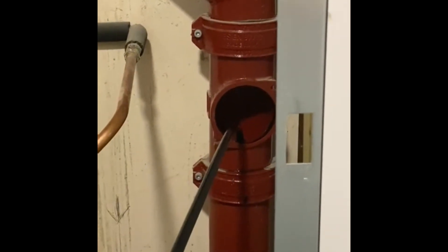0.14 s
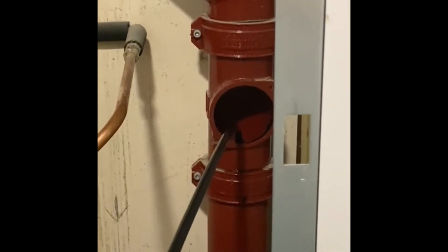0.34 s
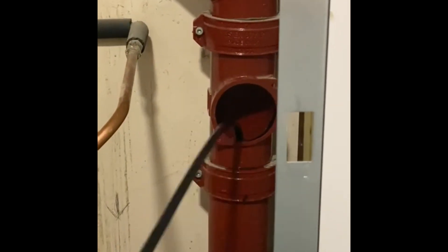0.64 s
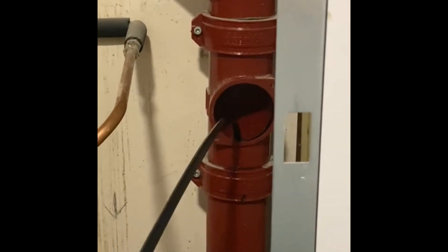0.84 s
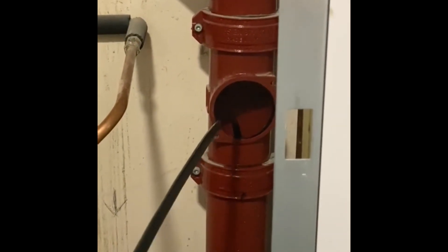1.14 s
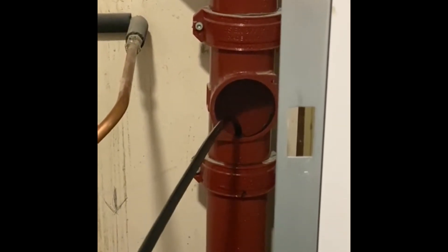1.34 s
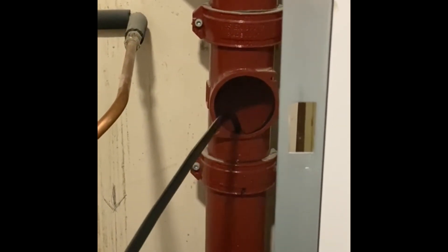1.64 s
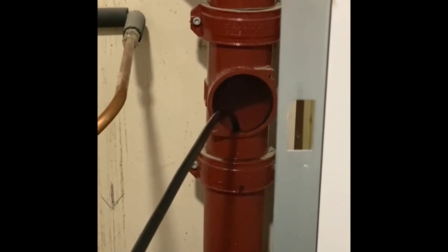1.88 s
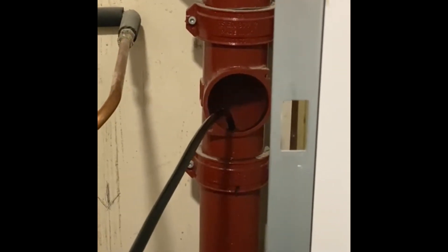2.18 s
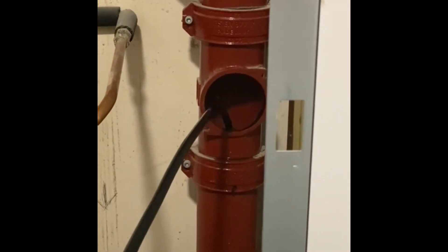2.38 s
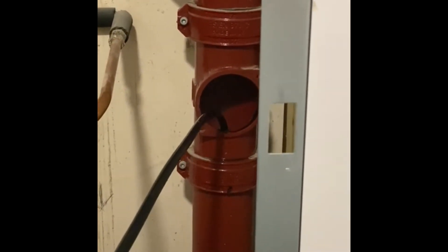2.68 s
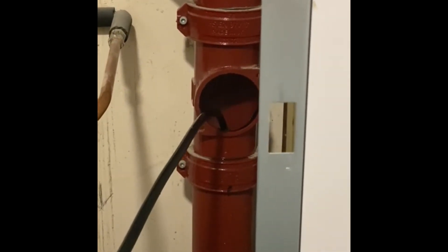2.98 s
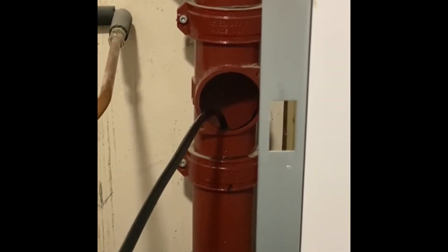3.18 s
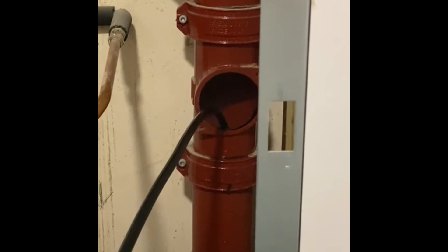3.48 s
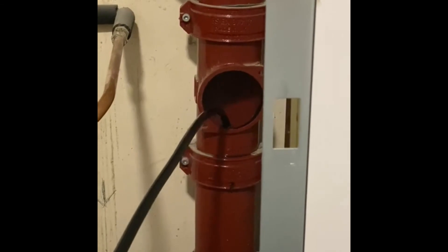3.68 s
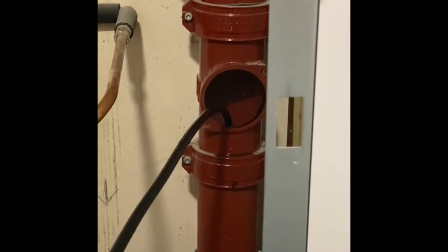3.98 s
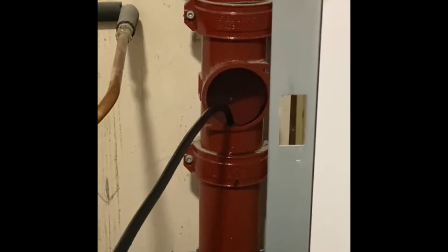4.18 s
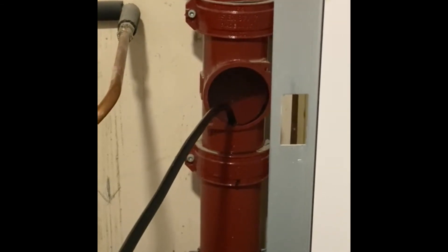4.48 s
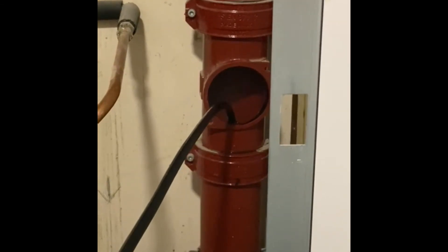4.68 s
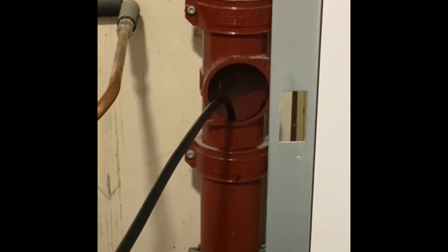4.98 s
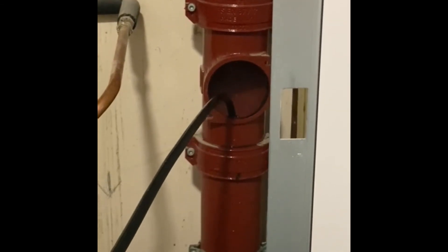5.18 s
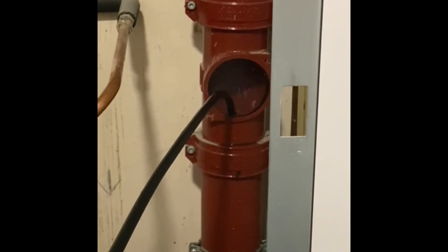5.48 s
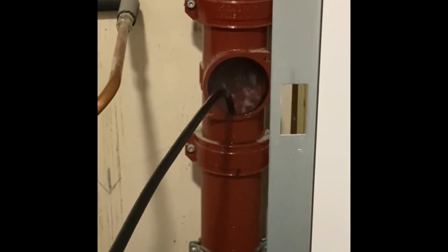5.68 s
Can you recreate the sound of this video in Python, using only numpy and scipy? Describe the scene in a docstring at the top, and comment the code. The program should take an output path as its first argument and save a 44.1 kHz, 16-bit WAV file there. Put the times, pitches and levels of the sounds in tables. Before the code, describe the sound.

For nearly six seconds a drain-cleaning machine runs close by in a small, reflective room. Its motor makes a steady low hum around 49 hertz with a dense buzzing stack of overtones, swaying and throbbing about twice a second, with an airy fan rush. Deep in an iron pipe the turning cable rumbles in dull, uneven thuds and rasps faintly with metallic resonance, the scraping strongest around 2 to 4 seconds. A double knock sounds at 0.3 seconds, and the rumble briefly jumps near 0.45 as the cable binds. Small ticks cluster at 0.9 to 1.1, another faint one at 1.7, then the brightest, loudest clank with quick rebounds at 2.45, ringing briefly. A mild bind thickens the rumble around 3.4. Near 5.7 the cable binds hard, the rumble surging and the motor growling under strain. Bright wide hiss grows slowly overall; the hand-held stereo microphone's drift shifts the hum's colour.

```python
"""An induction motor hums and throbs close by: a drain-cleaning machine at work in a small room.
The load of the cable sways its speed about twice a second; the hum is a stack of shaft orders.
The cable turns in an open iron drain pipe: shaped noise rumbles and scrapes, binding a few times.
Knocks ring as decaying pipe modes with scattered echoes, under a hiss that grows slowly overall.
A hand-held microphone with two ports drifts between two spots in the room's standing waves."""
import sys
import numpy as np
from scipy import signal
from scipy.fft import rfft, irfft, next_fast_len
from scipy.io import wavfile

SR = 44100
rng = np.random.default_rng(int(sys.argv[2]) if len(sys.argv) > 2 else 0)


def generate_wav(sig):
    """Save sig (samples, or channels by samples) to the path in sys.argv[1] as 16-bit PCM at SR."""
    pcm = np.round(np.clip(np.atleast_2d(sig).T, -1, 1) * 32767).astype(np.int16)
    wavfile.write(sys.argv[1], SR, pcm)


N = 257367
TIME = np.arange(N) / SR  # s

# drift of the hand-held microphone: t/s, place [0 = first spot, 1 = second spot]
MIC_PLACE = [(0, 0.28), (.9, 0.014), (1.5, 0.36), (2.5, 0.68), (3.6, 0.88), (4.5, 1.08), (5.84, 0.89)]
# how hard the housing buzzes: t/s, level/dB
MOTOR_EFFORT = [(0, 0), (1.3, 1), (1.6, 1.3), (2.6, 0.75), (3.8, -0.26), (5.84, 0)]
# the cable binds: t/s, half length/s, rise of the rumble/dB, strain on the motor [1 = full]
CABLE_BINDS = [(0.454, 0.061, 4, 0), (3.4, 0.3, 1.5, 0.1), (5.68, 0.16, 4, 1.1)]

SHAFT_HZ = 49.01  # mean turns per second
SWAY_RATE = 2.055  # sways of the speed per second
BEATS_PER_TURN = 4


def gain_of(db):
    """Decibels to amplitude."""
    return 10 ** (np.asarray(db) / 20)


def evened(x):
    """Scales to rms 1."""
    return x / np.sqrt(np.mean(abs(x) ** 2) + 1e-20)


def curve(rows):
    """Joins (s, value) rows by straight lines."""
    return np.interp(TIME, *np.transpose(rows))


def read(points, hz):
    """Reads (Hz, value) rows on a log-frequency axis."""
    f, value = np.transpose(points)
    return np.interp(np.log(hz + 1), np.log(abs(f) + 1), value)


def swell(s, half_s):
    """A smooth rise to 1 and fall around time s."""
    return np.exp(-((TIME - s) / half_s) ** 2)


def wander(rate_hz, size=2048):
    """Slow random motion of rms 1, up to about rate_hz."""
    hz = np.fft.rfftfreq(size, TIME[-1] / size)
    lowpass = np.exp(-.5 * (hz / rate_hz) ** 2)
    slow = irfft(rfft(rng.standard_normal(size)) * lowpass)
    return np.interp(TIME, np.linspace(0, TIME[-1], size), evened(slow))


def add(mix, s, sound):
    """Adds a stereo sound into the mix at time s."""
    part = mix[:, round(s * SR):][:, :sound.shape[1]]
    part += sound[:, :part.shape[1]]


def port_noise(colour_db, size=N, density=1):
    """Noise of spectrum colour_db(Hz), dB per Hz, at the two ports; density under 1 thins it to clicks."""
    # how alike the two ports hear: f/Hz, likeness [0-1]
    likeness = [(200, 1), (300, .94), (480, .73), (900, .55), (1400, .3), (1700, .98), (2100, 1),
                (2500, .9), (3300, 1), (4150, 1), (4600, .86), (6000, .92), (7000, .97), (7600, 1)]
    # by how much the left port leads, up to opposite phase at the top: f/Hz, lead/rad
    port_lead = [(0, 1), (2150, 0), (2500, .6), (3200, .15), (4100, .05), (4400, 1.1), (5000, 2.4),
                 (5400, 1.5), (6000, 1.65), (6500, 1.9), (7050, 2.55), (7700, np.pi)]
    length = next_fast_len(size, True)
    hz = np.fft.rfftfreq(length, 1 / SR)
    kept = rng.random(length) < density
    left, other = rfft(rng.standard_normal((2, length)) * kept)
    apart = hz > likeness[0][0]  # longer waves reach both ports alike
    same = np.where(apart, np.clip(read(likeness, hz), 0, 1), 1)
    right = same * left + np.sqrt(1 - same ** 2) * other
    right = right * np.exp(-1j * apart * read(port_lead, hz))
    spectrum = gain_of(colour_db(hz)) * np.sqrt(SR / 2)
    return irfft(np.array([left, right]) * spectrum)[:, :size]


def hiss(grain_db=.45, swell_db=.3):
    """A smooth, bright noise, very wide at the top where the two sides sound in opposite phase."""
    # spectrum before the level curve: f/Hz, level/dB per Hz
    hiss_colour = [(500, -100), (1400, -89.5), (1900, -86.5), (2400, -85), (3100, -82.5), (3700, -83),
                   (4400, -80.5), (5000, -81.5), (5400, -80), (6000, -80), (6500, -78.5), (7500, -79),
                   (8500, -78.5), (9500, -81), (10400, -77.5), (11200, -79), (11900, -87)]
    # overall rise: t/s, level/dB
    hiss_level = [(0, -6.5), (.55, -3), (1.5, -3.5), (2.2, -2), (3.2, -0.3), (4.5, .5), (5.84, -0.5)]
    level_db = curve(hiss_level) + grain_db * wander(57) + swell_db * wander(8.0)
    return port_noise(lambda hz: read(hiss_colour, hz)) * gain_of(level_db)


def rumble(lumpy_db=1.3, thuds_per_s=11, thud=.6, thud_s=.025, roll=.65):
    """The cable rolls and flops on the wall far down the pipe in dull, uneven thuds, harder where it binds."""
    # cable tumbling deep in the pipe, before binding: f/Hz, level/dB per Hz
    rumble_colour = [(15, -83), (38, -73), (55, -58), (70, -65.5), (120, -62.5), (180, -64), (270, -71),
                     (370, -74), (480, -79.7), (900, -105)]
    bind_db = sum(rise_db * swell(s, half_s) for s, half_s, rise_db, _ in CABLE_BINDS)
    thud_count = np.cumsum(thuds_per_s * np.exp(wander(6) / 2)) / SR
    age = thud_count % 1 / thuds_per_s
    thud_shape = (age / thud_s) * np.exp(2 - 2 * age / thud_s)  # peaks at half thud_s
    flops = evened(roll + thud * thud_shape)
    noise = port_noise(lambda hz: read(rumble_colour, hz))
    return noise * flops * gain_of(bind_db + lumpy_db * wander(7.3))


def scrape(turns, grain_db=1.5, rasp=0.23, shift_db=1.5):
    """The cable rasps on iron in step with the motor; pipe resonances come and go as the contact shifts."""
    # rubbed pipe resonances: f/Hz, width/Hz, level/dB at the first spot, level/dB at the second
    pipe_resonances = [(1400, 140, 3, -2.5), (1740, 150, -3.5, -4), (2044, 45, -1.5, 6),
                       (2276, 53, -3, -2.5), (2492, 170, 0, 0), (2760, 88, -6.5, -6.5), (3610, 110, -6, -1)]
    # scraping before the resonance levels: t/s, level/dB per Hz
    scrape_level = [(0, -82), (1.2, -81.5), (2.0, -79.5), (3.6, -79), (4.3, -81), (5.84, -82.5)]
    place, out = curve(MIC_PLACE), np.zeros((2, N))
    for centre_hz, width_hz, first_db, second_db in pipe_resonances:
        ring = port_noise(lambda hz: -20 * np.log10(1 + ((hz - centre_hz) / width_hz) ** 2))
        spot_db = first_db + place * (second_db - first_db)
        out += ring * gain_of(spot_db + shift_db * wander(2.8))
    level = gain_of(curve(scrape_level) + grain_db * wander(45))
    return out * level * (1 + rasp * np.cos(2 * np.pi * BEATS_PER_TURN * turns))


def knock(db, centre_hz, octaves, t60, ring=.62, room=.55, contact_s=.00015, room_rise_s=0.006,
          low_share=0.6, crack=1.6, crack_s=.0012, echoes_per_s=2500, mode_width_hz=50, between_db=-9):
    """Steel strikes iron: a sharp crack starts the modes at once; scattered echoes ring on in the pipe."""
    # modes of the struck pipe: f/Hz, level/dB, t60/s
    iron_modes = [(1510, 5.5, .04), (1760, 3.5, 0.039), (2070, 1, 0.046), (2250, 1, 0.053), (2455, 2, .025),
                  (2580, 0.5, 0.024), (2730, -2.5, 0.032), (3120, -4, 0.044), (3320, -6, .045),
                  (3610, 1.5, 0.046), (3890, -3.5, .035), (4680, -6, 0.04), (5460, -5.5, .03),
                  (6000, -5, 0.024)]

    def blow_db(hz):
        """Spectrum of the blow: a hump around its centre, cut steeply below."""
        hump_db = -10 * np.log10(1 + (np.log2((hz + 1) / centre_hz) / octaves) ** 4 / 2)
        return hump_db - 20 * np.log10(1 + (low_share * centre_hz / (hz + 1)) ** 6)

    def echo_db(hz):
        """Spectrum of the echoes: the blow, raised at the pipe modes."""
        peaks = sum(gain_of(mode_db) / (1 + ((hz - f) / mode_width_hz) ** 2) for f, mode_db, _ in iron_modes)
        return blow_db(hz) + 20 * np.log10(gain_of(between_db) + peaks)

    t = np.arange(SR // 4) / SR
    modes = np.zeros(len(t))
    for k, (hz, mode_db, mode_t60) in enumerate(iron_modes):
        decay = gain_of(mode_db + blow_db(hz) - 60 * t / mode_t60)
        modes += (-1) ** k * decay * np.sin(2 * np.pi * hz * t)
    modes /= np.std(modes[:SR // 200])  # levelled over the first 5 ms
    snap = np.exp(-t / crack_s) * np.sin(2 * np.pi * centre_hz * t)
    onset = 1 - np.exp(-(t / contact_s) ** 2)
    echoes = evened(port_noise(echo_db, size=len(t), density=echoes_per_s / SR))
    echoes = echoes * gain_of(-60 * t / t60) * (1 - np.exp(-t / room_rise_s))
    return gain_of(db) * ((crack * snap + ring * modes) * onset + room * echoes)


def fan(turns, chop=0.24, lumpy_db=0.5):
    """Fan and bearings rush with the motor's effort and pulse a little with every turn."""
    # rush before the effort: f/Hz, level/dB per Hz
    fan_colour = [(150, -84.5), (370, -73), (450, -75), (600, -75), (700, -70.5), (820, -77.5), (1000, -75),
                  (1250, -79), (1500, -86), (1900, -87.5), (3000, -110)]
    level = gain_of(curve(MOTOR_EFFORT) + lumpy_db * wander(13))
    pulse = 1 + chop * np.cos(2 * np.pi * turns)
    return port_noise(lambda hz: read(fan_colour, hz)) * level * pulse


def drive(unsteady=0.2):
    """Drive and cable add wavering tones that are not locked to the shaft."""
    # tones beside the hum: f/Hz, level/dB, width of the wavering/Hz
    drive_tones = [(115.4, -44.5, 0.29), (133.8, -54, 1.7), (58.35, -51.5, 5), (77, -51, 6.3),
                   (361.6, -56.5, 3), (472.4, -61.5, 10), (712, -61, 12)]
    out = np.zeros(N)
    for hz, db, width_hz in drive_tones:
        cycles = np.cumsum(hz + width_hz / 2 * wander(4)) / SR + rng.random()
        tone = (1 + unsteady * wander(6.8)) * np.sin(2 * np.pi * cycles)
        out += gain_of(db) * evened(tone)
    return out


def shaft(sway_depth_hz=0.15, sway_crest_s=0.1704, spurt_s=1.135, spurt_half_s=.035, spurt_hz=.28,
          thump_s=1.156):
    """Turns of the shaft: its speed sways, and spurts once as the load eases; zero at one thump."""
    sway = sway_depth_hz * np.cos(2 * np.pi * SWAY_RATE * (TIME - sway_crest_s))
    speed = SHAFT_HZ + sway + spurt_hz * swell(spurt_s, spurt_half_s)
    turns = np.cumsum(speed) / SR
    return turns - np.interp(thump_s, TIME, turns)


def motor(turns, flutter_db=0.8, rattle=0.12, rattle_hz=14, blur=0.15, port_spread=0.48):
    """Every turn shakes the housing alike: a stack of shaft orders, each a little unsteady."""
    # hum, rows in order: multiple of the shaft speed, level/dB at the first spot, at the second, left-right/dB
    hum_orders = [(1, -35.5, -37, 0), (2, -39.5, -36.5, 0), (3, -40.0, -40, 0), (4, -48.0, -49, -0.1),
                  (5, -46, -44, -0.5), (6, -51, -51, -1), (7, -49.5, -49.5, -1.5), (8, -50, -52, 0.5),
                  (9, -50.5, -50, -2), (10, -64, -57, 3), (11, -51, -48, 3.5), (12, -60.5, -63, 3),
                  (13, -49.5, -49, -0.5), (14, -48.5, -47, 0.5), (15, -52, -48, 2.5), (16, -63.5, -64, 14),
                  (17, -55.5, -52.5, 1.5), (18, -58, -55, 2.5), (19, -49.5, -52, 1.5),
                  (20, -59, -60.5, 11.5), (21, -53.5, -56, 5), (22, -46.5, -52.5, 1.5),
                  (23, -54.5, -48, 0.5), (24, -55, -50.5, 15.5), (25, -48.5, -45.5, 5.5),
                  (26, -52, -50.5, 3), (27, -60.5, -71, 10.5), (28, -51, -60, 10), (29, -48, -58.5, 3),
                  (30, -61.5, -69.5, 6.5), (31, -57, -58, 2), (32, -65, -61, -0.5), (33, -61, -59.5, 0),
                  (34, -67.5, -67, 3.5), (35, -62, -57.5, -1.5), (36, -64, -62.5, 0),
                  (37, -72.5, -65, -1.5), (38, -68.5, -74.5, -4), (39, -57.5, -74, -1.5)]
    # low orders throb with the sway: order, depth [0-1] at the first spot, at the second,
    # beats per sway, t/s of one trough
    order_throbs = [(2, 0.3, 0.09, 1, .59), (3, .25, 0.31, 1, 0.721), (4, 0.7, .65, 1, .425),
                    (4, 0.3, 0.4, 2, .236), (5, .85, 0.89, 1, 0.568), (5, 0.3, 0.23, 2, 0.16),
                    (6, 0.8, .8, 2, 0.99)]
    # full strain weakens the once-a-turn shake and lifts the growl just above it: f/Hz, level/dB
    strain_colour = [(49, -5.5), (98, 2), (147, 5), (245, 4), (390, -1.5)]
    # the microphone crosses nodes and antinodes: t/s, half length/s, centre f/Hz, half width/Hz, level/dB
    node_crossings = [(1.28, 0.14, 708, 42, -13.5), (0.96, .4, 735, 25, -4.5), (1.05, 0.33, 637, 25, -2),
                      (3.9, .3, 637, 25, -4), (1.25, .23, 932, 25, 3), (1.65, .25, 1128, 25, 4),
                      (2.7, 0.69, 1128, 25, 3.5), (.9, 0.9, 1030, 25, -4.5), (5, 1.1, 1078, 21, -5),
                      (2, .8, 1275, 25, 3), (2.7, .8, 1422, 25, 3), (5.3, 0.63, 1422, 25, -7.5),
                      (.6, 0.65, 1520, 25, -8), (1.8, 0.37, 1716, 25, 4.5), (1.35, .25, 368, 45, 3),
                      (3.1, .45, 49, 20, -2), (4.2, .2, 245, 25, 3)]
    # orders on the flank of a room resonance swell with the sway: order, swing/dB, t/s of one crest
    order_swings = [(7, 2.5, .21), (9, 1.5, 0.18), (11, 2, 0.24), (13, 2.3, 0), (14, 1.5, 0.28), (15, 1, 0),
                    (17, 3, .16), (19, 1.3, 0.13), (21, 1.8, 0), (22, 2, .19), (24, 5, 0.21), (25, 1, 0.13),
                    (26, 1.5, 0.18), (28, 3, .2), (31, 3, 0.1)]
    place, effort_db, out = curve(MIC_PLACE), curve(MOTOR_EFFORT), np.zeros((2, N))
    strain = sum(share * swell(s, half_s) for s, half_s, _, share in CABLE_BINDS)
    nodes = [(node_db * swell(s, half_s), centre_hz, width_hz)
             for s, half_s, centre_hz, width_hz, node_db in node_crossings]
    turn, partial = np.exp(2j * np.pi * turns), 1
    for order, first_db, second_db, pan_db in hum_orders:
        order = round(order)
        partial = partial * turn  # each row is the next multiple
        hz = order * SHAFT_HZ
        high = min(order / 12, 1)  # long waves are the steadiest
        db = first_db + place * (second_db - first_db)
        db += (1 + high) / 2 * (effort_db + flutter_db * wander(2.54))
        db += strain * read(strain_colour, hz)
        for node_db, centre_hz, width_hz in nodes:
            db += node_db * np.exp(-((hz - centre_hz) / width_hz) ** 2)
        # the sway slides some orders up and down the flank of a room resonance
        for which, swing_db, crest_s in order_swings:
            if round(which) == order:
                db += swing_db * np.cos(2 * np.pi * SWAY_RATE * (TIME - crest_s))
        # the lowest orders join in one dull thump a turn; the rest spread into four blurred beats a turn
        thumps = order <= 3
        phase = .5 if thumps else order ** 2 / (2 * BEATS_PER_TURN) + blur * rng.standard_normal()
        tone = gain_of(db) * partial * np.exp(2j * np.pi * phase)
        tone *= 1 + rattle * high * (wander(rattle_hz) + 1j * wander(rattle_hz))
        throb = 0
        for which, first, second, beats, trough_s in order_throbs:
            if round(which) == order:
                depth = np.clip(first + place * (second - first), 0, 1)
                throb = throb + depth * np.exp(2j * np.pi * round(beats) * SWAY_RATE * (TIME - trough_s))
        tone *= 1 - throb
        # orders caught near a node differ between the ports in both level and phase
        pan_db = pan_db * (not thumps)
        lead = port_spread * high * np.tanh(pan_db / 2) * (-1) ** order
        ports = evened(gain_of([pan_db / 2, -pan_db / 2])) * np.exp([1j * lead, -1j * lead])
        out += (np.sqrt(2) * ports[:, None] * tone).real
    return out


def scene():
    """Motor, drive, cable and pipe together."""
    # the cable knocks on the pipe and rebounds: t/s, level/dB, centre f/Hz, width/octaves, t60 of the echoes/s
    pipe_knocks = [(0.2973, -30.5, 1580, .33, .11), (.3015, -39.5, 1700, .35, .08),
                   (.3105, -40, 2400, .5, .11), (.4035, -40, 2600, .55, .06), (0.665, -42.5, 3100, .1, .06),
                   (.912, -44, 1900, .43, .08), (.9185, -42, 1800, .45, .1), (.9515, -37.5, 3400, .35, .13),
                   (.957, -41, 2600, .45, .1), (0.9722, -42, 2900, .45, .12), (1.102, -46, 2900, .4, 0.073),
                   (1.672, -44.5, 3400, .4, .1), (2.4396, -26.5, 2850, .7, .2),
                   (2.447, -32, 2400, .45, .12), (2.4535, -37, 4400, .25, .09)]
    turns = shaft()
    mix = hiss() + rumble() + scrape(turns) + fan(turns) + drive() + motor(turns)
    for s, *blow in pipe_knocks:
        add(mix, s, knock(*blow))
    return mix


def record(dry, edge_hz=11900):
    """The recorder's steep band limit: a long lowpass filter."""
    lowpass = signal.firwin(401, edge_hz, window=("kaiser", 8), fs=SR)
    return signal.oaconvolve(dry, lowpass[None], "same")


dry = scene()
out = record(dry)
generate_wav(out)
```